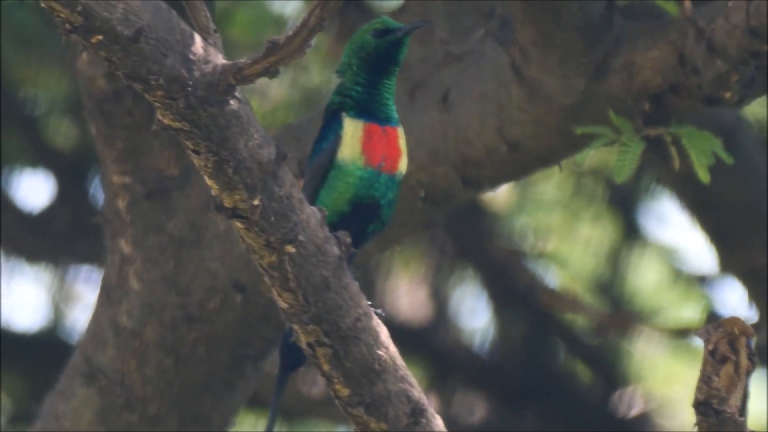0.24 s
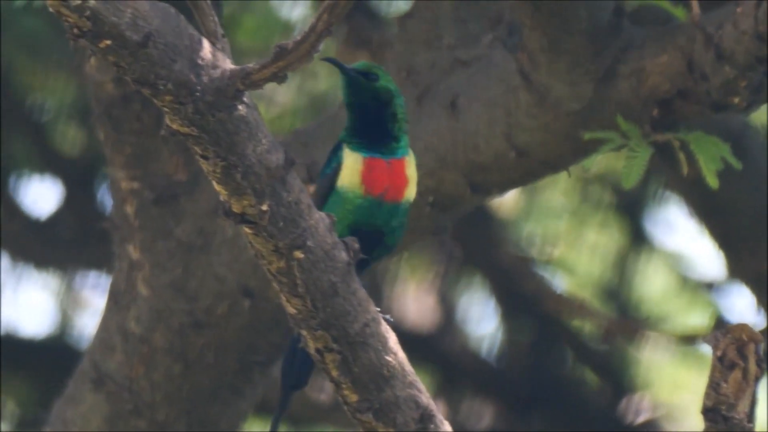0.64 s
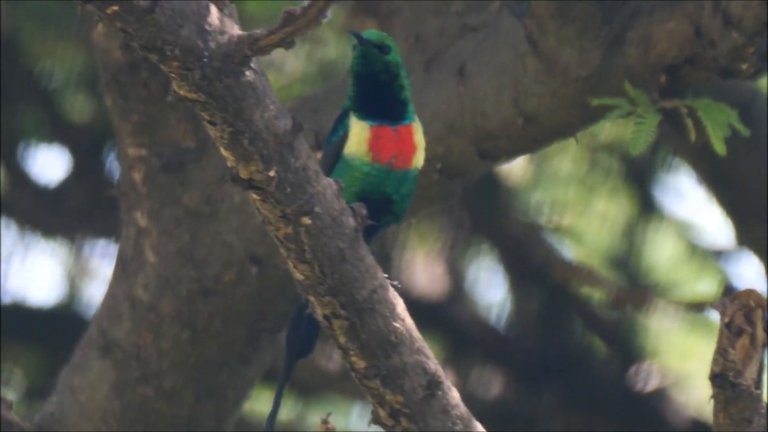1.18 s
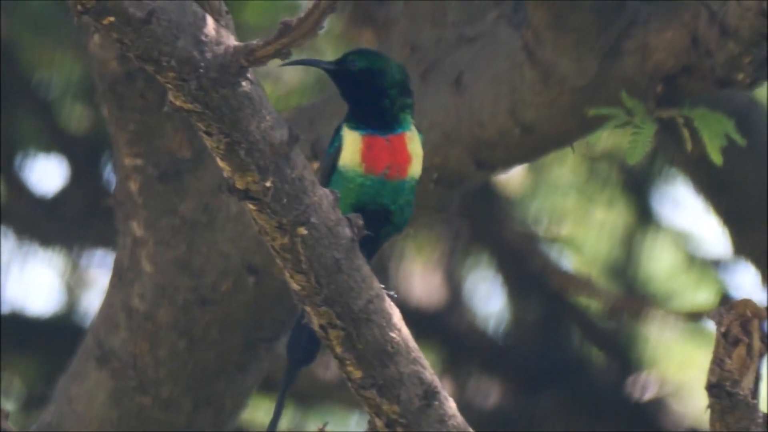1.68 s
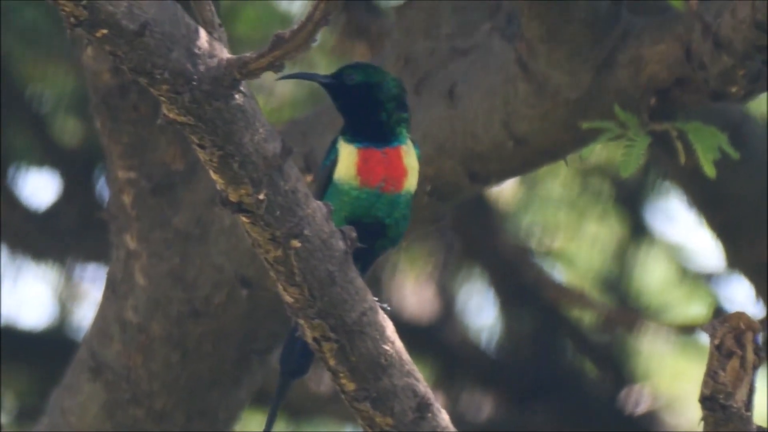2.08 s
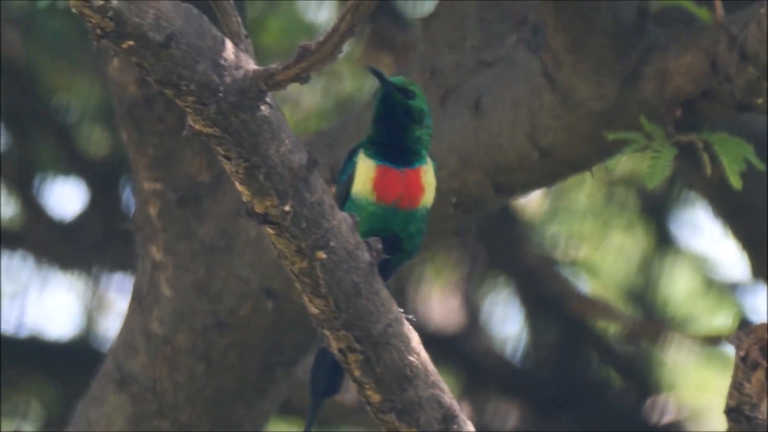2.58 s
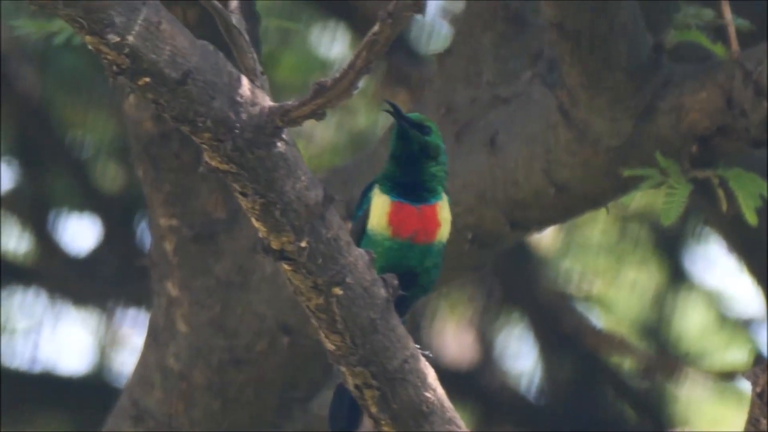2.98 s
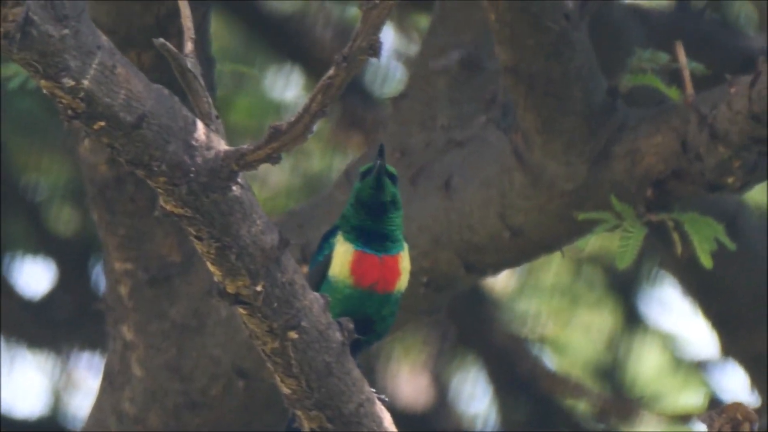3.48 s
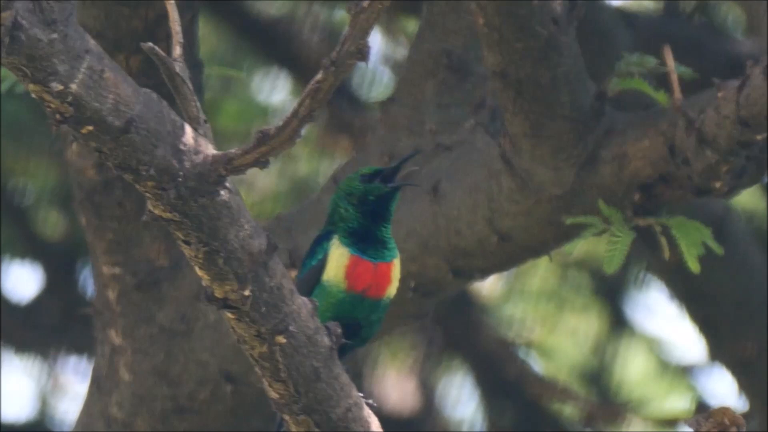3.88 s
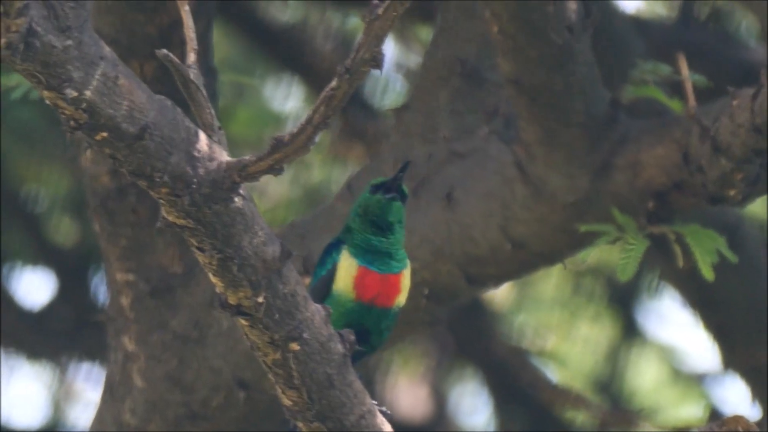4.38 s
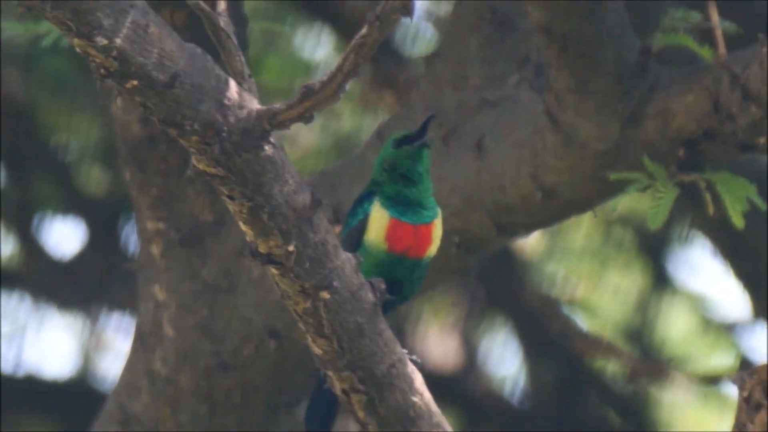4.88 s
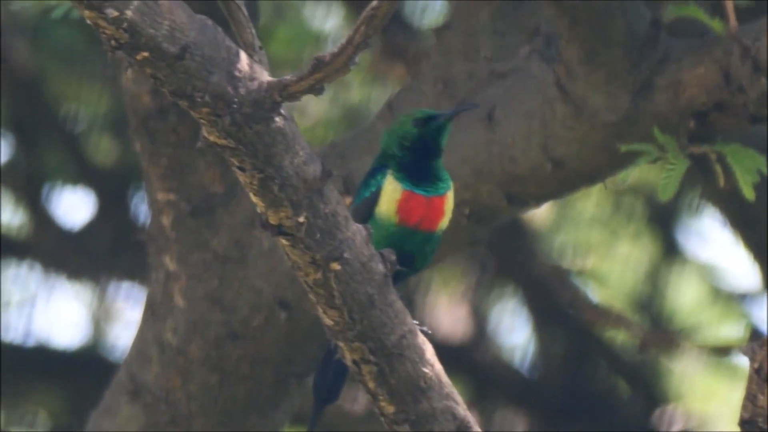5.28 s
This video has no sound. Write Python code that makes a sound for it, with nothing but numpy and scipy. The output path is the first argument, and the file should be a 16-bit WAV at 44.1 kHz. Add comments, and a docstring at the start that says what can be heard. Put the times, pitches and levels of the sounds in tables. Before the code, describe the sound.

Outdoors in a tree, dry chirps quicken into bright high twittering; faint engine throb, distant peeps, handling knocks, and a final sharp click.

```python
"""Over a soft outdoor rush, a distant engine, pulsed once per firing, throbs and fades; a far bird peeps and whistles.
A handled camera knocks, crackles and rubs: lone impulses, grainy noise and ringing modes.
Then a sunbird on a branch, built from gliding and shaken sine tones, gives eight harsh chips, a quicker
twitter and high, slurred whistles, answered by echoes from trunk and limbs and a noise tail from the crown.
A sharp control click ends it."""
import sys
import numpy as np
from scipy import signal
from scipy.fft import rfft, irfft, next_fast_len
from scipy.io import wavfile
from scipy.ndimage import map_coordinates

SR = 44100
rng = np.random.default_rng(int(sys.argv[2]) if len(sys.argv) > 2 else 0)


def wrap_up_sound(samples):
    """Save the sound to the file named by the first command line argument, as 16-bit audio."""
    columns = np.atleast_2d(samples).T
    # keep every value between -1 and 1, then stretch to whole-number steps
    tamed = np.clip(columns, -1, 1)
    steps = np.round(tamed * 32767).astype(np.int16)
    wavfile.write(sys.argv[1], SR, steps)


N = 244314  # length in samples, about 5.54 s


def amp(db):
    """Decibels to an amplitude factor."""
    return 10 ** (np.asarray(db) / 20)


def unit(x):
    """Scale to an rms of 1."""
    return x / np.sqrt(np.mean(x ** 2) + 1e-20)


def along(points, hz):
    """Read (f/Hz, value) points at hz, on a log frequency axis."""
    f, v = np.transpose(points)
    return np.interp(np.log(hz + 1), np.log(f + 1), v)


def curves(rows):
    """One automation curve, a value per sample, for each column after the time."""
    s, *cols = np.transpose(rows)
    return [np.interp(np.arange(N) / SR, s, c) for c in cols]


def wobble(rate):
    """A smooth random curve with rate knots a second."""
    knots = rng.standard_normal(N // 4)
    return map_coordinates(knots, [np.arange(N) * rate / SR], mode="wrap")


def filtered(x, response):
    """Filter x by a response of frequency, padded so that the end does not wrap round."""
    m = next_fast_len(N + SR // 2)
    return irfft(rfft(x, m) * response(np.fft.rfftfreq(m, 1 / SR)), m)[..., :N]


def coloured(x, spectrum):
    """EQ x with a (f/Hz, level/dB) curve."""
    return filtered(x, lambda hz: amp(along(spectrum, hz)))


def add(track, s, sound):
    """Mix a sound into the track at s seconds."""
    part = track[round(s * SR):][:len(sound)]
    part += sound[:len(part)]


def swell(u, crest, edge):
    """A note's envelope of rms 1: it rises to its crest and falls back to silence."""
    arch = np.sin(np.pi * np.interp(u, [0, np.clip(crest, .1, .9), 1], [0, .5, 1]))
    return unit(np.abs(arch) ** edge)


def arc(s, length, pitches, db, crest, rasp, doubling=0, edge=0.22):
    """A note whose pitch bends smoothly through the values: (s, pitch, envelope, rasp, doubling)."""
    u = np.linspace(0, 1, round(length * SR))
    bend = np.polyfit(np.linspace(0, 1, len(pitches)), pitches, len(pitches) - 1)
    return s, np.polyval(bend, u), amp(db) * swell(u, crest, edge), rasp, doubling


# spectrum of the open air: (f/Hz, relative level/dB per Hz)
AIR = [(25, 10.5), (70, -7.5), (120, -5.5), (220, -1), (350, -3), (500, -5.5), (850, -3), (1100, -4),
       (1450, -12), (1820, -7.5), (2100, -14.5), (3200, -13.5), (4500, -19.5), (8200, -24.5), (9100, -30.5)]
# likeness of left and right in the air: (f/Hz, correlation)
ALIKE = [(30, 0.78), (120, .99), (300, 0.98), (600, 0.91), (1200, 0.68), (3000, 0.44), (8000, 0.1)]
# swells of the breeze, before a small lift and flutter: (t/s, level/dB)
BREEZE = [(0, -54.5), (1.16, -54), (1.8, -53.5), (2.4, -54), (4.09, -53.5), (4.33, -49.5), (4.55, -53.5),
          (5.54, -54.5)]
# spectrum of the microphone hiss: (f/Hz, relative level/dB per Hz)
HISS = [(8900, -35), (9600, -11), (10700, -8.5), (11300, -5), (12000, -.5), (15700, 0)]
HISS_DB = -65.5


def air(lift_db=1, flutter_db=.3):
    """A soft outdoor rush, most alike left and right in the bass, over each microphone's own hiss."""
    def turn(hz):
        # the angle that splits the power between mid and side
        return np.arccos(np.clip(along(ALIKE, hz), -1, 1)) / 2

    def mid_side(hz):
        return amp(along(AIR, hz)) * [np.cos(turn(hz)), np.sin(turn(hz))]

    mid, side = filtered(rng.standard_normal((2, N)), mid_side)
    level_db = curves(BREEZE)[0] + lift_db + flutter_db * wobble(6.3)
    rush = unit(np.array([mid + side, mid - side])) * amp(level_db)
    hiss = unit(coloured(rng.standard_normal((2, N)), HISS))
    return rush + amp(HISS_DB) * hiss


# engine speed: (t/s, firings per s)
FIRING = [(0, 27.45), (.4, 28.3), (1, 29.55), (1.3, 30.1), (2, 30.9), (2.6, 31.4), (5.54, 32)]
# engine loudness, before a random scatter: (t/s, level/dB, gain of the deepest boom/dB)
ENGINE = [(0, -53, 2.5), (.4, -56, 3.5), (.7, -53, 3), (1, -55.5, 1.5), (1.3, -58, 2), (1.6, -56.5, -15),
          (2, -62, 7), (2.6, -62.5, -4), (3.1, -72, -2), (5.54, -85, 0)]
# spectrum of the exhaust: (f/Hz, level/dB)
EXHAUST = [(30, -26), (75, -16), (110, -1.5), (148, 4), (180, -5.5), (240, -7.5), (320, -13), (450, -68),
           (1500, -75)]
# the part of the exhaust that swells on its own: (f/Hz, level/dB)
BOOM = [(120, 0), (138, -40)]


def engine(scatter_db=1, first_turn=.5):
    """One puff per firing; only the exhaust's low notes carry this far, and the deepest swells and sinks."""
    turns = first_turn + np.cumsum(curves(FIRING)[0]) / SR
    firings = np.diff(np.floor(turns), prepend=0)
    level_db, boom_db = curves(ENGINE)
    puffs = unit(coloured(firings, EXHAUST))
    boom = (amp(boom_db) - 1) * coloured(puffs, BOOM)
    return -amp(level_db + scatter_db * wobble(20)) * (puffs + boom)


# decay of the leafy crown: (f/Hz, t60/s)
CROWN = [(200, 0.1), (3000, 0.044), (6000, 0.44), (8200, 0.29), (14000, 0.064)]


def crown(x, width=0.83, build_s=0.00078, patchy_db=4):
    """Leaves and twigs scatter the sound into a short, patchy tail of decaying noise."""
    grains = rng.standard_normal((2, SR // 2)) * amp(patchy_db * wobble(294)[:SR // 2])
    hz, t, z = signal.stft(grains, SR, nperseg=256)
    fade = amp(-60 * t / along(CROWN, hz)[:, None]) * (1 - np.exp(-t / build_s))
    mid, side = signal.istft(z * fade, SR, nperseg=256)[1]
    tail = np.array([mid + width * side, mid - width * side])
    return signal.fftconvolve(x[None], tail / np.linalg.norm(tail[0]), axes=1)[:, :N]


def arriving(x, delay_s, db, skew_s):
    """A sound after a path of delay_s, reaching the two microphones a little apart."""
    delays_s = delay_s + np.array([[skew_s], [-skew_s]])
    return amp(db) * filtered(x, lambda hz: np.exp(-2j * np.pi * hz * delays_s))


# the far bird's falling peeps: (t/s, start f/Hz, level/dB)
PEEPS = [(.941, 6160, -69), (1.0, 6100, -69), (1.032, 6150, -68), (1.091, 6150, -68), (1.126, 5850, -70),
         (1.158, 5580, -72), (1.19, 6000, -65), (1.226, 6050, -73), (1.254, 5830, -76),
         (1.471, 4650, -65.5), (1.51, 6600, -70), (1.55, 4680, -69), (1.789, 4750, -66),
         (1.817, 4720, -63.5), (3.41, 6200, -74), (3.443, 6100, -68)]
# thin arches from farther still: (t/s, length/s, level/dB)
FAR_WHISTLES = [(1.91, .05, -79), (1.98, .07, -74), (2.057, .085, -75), (2.16, .07, -78)]
# their upper voice at start, middle and end: f/Hz
FAR_ARCH_HZ = (4080, 4450, 4100)


def far_bird(length=0.012, fall=0.115, lower_db=-2, lower_ratio=.865):
    """Short sine peeps that slide down, and a few thin whistles of two sines at a fixed pitch ratio."""
    song, u = np.zeros(N), np.linspace(0, 1, round(length * SR))
    for s, span, db in FAR_WHISTLES:
        _, pitch, envelope, *_ = arc(s, span, FAR_ARCH_HZ, db, crest=.55, rasp=0)
        phase = 2 * np.pi * np.cumsum(pitch) / SR
        voices = np.sin(phase) + amp(lower_db) * np.sin(lower_ratio * phase)
        add(song, s, envelope * unit(voices))
    for s, hz, db in PEEPS:
        tone = unit(np.sin(2 * np.pi * np.cumsum(hz * (1 - fall * u)) / SR))
        add(song, s, amp(db) * swell(u, 0.62, edge=0.45) * tone)
    return song


def struck(modes, bright_db):
    """One blow of peak 1: neighbouring modes swing opposite ways, a harder contact favours the high ones."""
    t = np.arange(SR // 10) / SR
    ring = np.zeros(len(t))
    for k, (hz, db, t60) in enumerate(modes):
        tilt_db = bright_db * np.log10(hz / modes[0][0])  # dB per decade above the lowest mode
        ring += (-1) ** k * amp(db + tilt_db - 60 * t / t60) * np.sin(2 * np.pi * hz * t)
    return ring / np.abs(ring).max()


# Handling levels below are set before the scene's camera gain; crackles also before boost and grip EQ.
# sharp crackles of the grip: (t/s, level/dB)
CRACKLES = [(1.1578, -38.5), (1.1813, -31.5), (1.327, -47), (1.4571, -52), (1.658, -50), (1.846, -56),
            (1.9855, -44)]
# EQ of the grip: (f/Hz, level/dB)
GRIP = [(100, -22), (600, -9), (1300, -1), (2000, 0), (2750, 1), (3300, -17), (4500, -22), (6000, -18),
        (7500, -28), (10000, -45)]
# fingers rub on the grip, before the skin's ticks: (t/s, length/s, level/dB)
RUBS = [(1.169, 0.07, -59), (1.452, 0.11, -66.5), (1.575, 0.1, -59), (1.833, 0.022, -57.5),
        (1.976, 0.035, -66)]
# EQ of rubbing skin: (f/Hz, level/dB)
SKIN = [(100, -16), (500, -1), (2200, 0), (3200, -9), (6000, -19), (10000, -45)]
# knocks on the camera body: (t/s, peak level/dB, brightness/dB per decade)
KNOCKS = [(.675, -44.5, -34), (0.684, -45.5, -18), (2.953, -45.5, -23), (3.178, -41.5, -13),
          (4.163, -19, 4.5), (4.181, -39, 14)]
# modes of the camera body: (f/Hz, level/dB, t60/s)
BODY = [(200, 3, 0.049), (377, 2.5, 0.034), (825, -4, 0.027), (1030, 2, 0.023), (1540, -2, 0.0041),
        (2200, -6, 0.0047)]
# fingertips tap the hollow grip: (t/s, peak level/dB)
TAPS = [(1.463, -44.5), (1.59, -50), (1.632, -48), (1.848, -48), (1.99, -42.5)]
# modes of the hollow grip: (f/Hz, level/dB, t60/s)
HOLLOW = [(306, -1.5, 0.13), (630, -1.5, 0.15), (1030, -2, 0.025), (1860, 1, 0.019)]
# a control clicks and seats: (t/s, peak level/dB)
CLICKS = [(5.5259, -15.5), (5.5305, -25.5)]
# modes of the control: (f/Hz, level/dB, t60/s)
BUTTON = [(1940, -23, 0.032), (2934, 2.5, 0.031), (3540, 13, 0.0031), (5040, 1, 0.006), (7380, 6, 0.0048),
          (8100, -31, 0.0028), (11200, -26, .002)]


def handling(snap_db=17, grain_db=4, ticks_per_s=90, tick_db=18):
    """Impulses crackle in the grip, grainy noise rubs, and struck modes knock, tap and click."""
    snaps, pressure, shell = np.zeros((3, N))
    for s, db in CRACKLES:
        add(snaps, s, amp([db + snap_db]))
    for s, length, db in RUBS:
        add(pressure, s, amp(db) * swell(np.linspace(0, 1, round(length * SR)), 0.18, edge=0.28))
    # skin sticks and slips, so the rubbing comes in small grains with stray ticks among them
    grains = rng.standard_normal(N) * amp(grain_db * wobble(500))
    rubbing = pressure * unit(coloured(grains, SKIN))
    ticks = amp(tick_db) * pressure * (rng.random(N) < ticks_per_s / SR)
    for s, db, bright_db in KNOCKS:
        add(shell, s, amp(db) * struck(BODY, bright_db))
    for s, db in TAPS:
        add(shell, s, amp(db) * struck(HOLLOW, 0))
    for s, db in CLICKS:
        add(shell, s, amp(db) * struck(BUTTON, 0))
    return coloured(snaps + ticks, GRIP) + rubbing + shell


# Song levels below are set before the throat's EQ, and pitches before the voice's random shake.
# harsh opening chips: (t/s, length/s, level/dB, reference f/Hz)
CHIPS = [(2.602, 0.026, -53, 3700), (2.729, 0.028, -52.5, 3760), (2.924, 0.0295, -52, 3670),
         (3.086, 0.022, -53, 3790), (3.294, .024, -55.5, 3800), (3.52, 0.0238, -52.5, 3990),
         (3.705, 0.027, -54.5, 3910), (3.869, 0.023, -54.5, 3900)]
# strands of a chip, from low to high: (delay/s, offset from the reference f/Hz, relative level/dB)
CHIP_STRANDS = [(.017, -560, -9.5), (.004, -7, -1.5), (0, 805, -2), (0, 1580, -5.5), (0, 2447, -16),
                (0, 4002, -20.5)]
CHIP_FALL_HZ, CHIP_RASP = 600, 0.496
# from the fourth on, each chip runs into a falling slur: (t/s, length/s, start f/Hz, middle f/Hz, level/dB)
SLURS = [(3.106, 0.052, 5200, 4400, -54.5), (3.305, 0.054, 5200, 4590, -51.5),
         (3.539, 0.051, 5250, 4330, -51.5), (3.722, .056, 5150, 4490, -51),
         (3.884, 0.061, 5030, 4870, -48.5)]
SLUR_END_HZ, SLUR_RASP = 3466, 0.49
# ragged strands above and below each slur: (start f/Hz, end f/Hz, level over the slur/dB)
STRANDS = [(6370, 5800, -14.5), (4250, 3350, -10.5)]
STRAND_LEAD_S, STRAND_S, STRAND_RASP = .006, 0.055, 0.464


def chips():
    """Short, harsh stacks of falling strands; the later ones trail off in a slur."""
    for s, length, db, reference_hz in CHIPS:
        for delay, offset_hz, strand_db in CHIP_STRANDS:
            hz = reference_hz + offset_hz
            fall = (hz + CHIP_FALL_HZ / 2, hz - CHIP_FALL_HZ / 2)
            yield arc(s + delay, length, fall, db + strand_db, crest=0.56, rasp=CHIP_RASP, edge=0.45)
    for s, length, top_hz, middle_hz, db in SLURS:
        yield arc(s, length, (top_hz, middle_hz, SLUR_END_HZ), db, crest=0.37, rasp=SLUR_RASP)
        for start_hz, end_hz, strand_db in STRANDS:
            yield arc(s - STRAND_LEAD_S, STRAND_S, (start_hz, end_hz), db + strand_db,
                      crest=0.24, rasp=STRAND_RASP)


# reedy tones that break into a downward flick:
# (t/s, length/s, start f/Hz, middle f/Hz, end f/Hz, level/dB, flick f/Hz, flick level/dB)
TWITTER = [(4.02, 0.028, 6920, 6270, 5980, -45.5, 5390, -45.5),
           (4.068, 0.039, 5350, 5500, 5380, -47.5, 5510, -43),
           (4.129, 0.022, 6100, 6700, 7280, -47, 5300, -43),
           (4.187, 0.034, 5080, 5390, 5600, -45.5, 5500, -43),
           (4.252, 0.025, 6380, 6430, 7170, -45, 5350, -44),
           (4.327, 0.025, 5300, 5390, 5500, -46.5, 5670, -42),
           (4.392, .025, 6390, 6680, 7860, -46, 6500, -46.5),
           (4.464, 0.024, 5280, 5330, 5500, -44.5, 5470, -44),
           (4.532, 0.013, 5440, 6300, 6940, -48, 7050, -43)]
TWITTER_RASP, TWITTER_DOUBLING = 0.28, 1
FLICK_S, FLICK_FALL, FLICK_RASP = 0.0129, 0.111, 0.4  # length, share of its pitch that it loses, rasp
FLICK_LEAD_S = .0025  # the flick starts before its tone has ended
# a second vibration throws side strands round each flick: (pitch ratio to the flick, relative level/dB)
FLICK_SIDES = [(1.22, -12.5), (1.5, -15)]
# the other side of the syrinx, under each flick: start, middle and end pitch, and level
UNDERTONE_HZ, UNDERTONE_DB = (3800, 3840, 3460), -56.5
# notes that plunge: (t/s, length/s, start f/Hz, middle f/Hz, end f/Hz, level/dB)
PLUNGES = [(4.147, 0.025, 7260, 6950, 5500, -53), (4.154, 0.017, 5180, 4950, 4150, -41),
           (4.273, 0.011, 5200, 4950, 3950, -49), (4.415, 0.016, 7300, 6400, 3860, -44.5),
           (4.544, 0.021, 7010, 5960, 3460, -51.5)]


def twitter():
    """Quick syllables, high and low by turns; each tone snaps into a rasping flick over a weak undertone."""
    for s, length, start_hz, middle_hz, end_hz, db, flick_hz, flick_db in TWITTER:
        yield arc(s, length, (start_hz, middle_hz, end_hz), db,
                  crest=0.61, rasp=TWITTER_RASP, doubling=TWITTER_DOUBLING, edge=0.17)
        flick_s = s + length - FLICK_LEAD_S
        fall = np.array([flick_hz, flick_hz * (1 - FLICK_FALL)])
        yield arc(flick_s, FLICK_S, fall, flick_db, crest=0.2, rasp=FLICK_RASP)
        for ratio, side_db in FLICK_SIDES:
            yield arc(flick_s, FLICK_S, ratio * fall, flick_db + side_db, crest=0.27, rasp=FLICK_RASP)
        yield arc(flick_s, FLICK_S, UNDERTONE_HZ, UNDERTONE_DB, crest=0.38, rasp=0.12)
    for s, length, *pitches, db in PLUNGES:
        yield arc(s, length, pitches, db, crest=0.53, rasp=0.49, doubling=1.0)


# free whistles, and a fading, buzzing echo near 7 kHz, one curve each: (t/s, f/Hz, level/dB, rasp 0-1)
WHISTLES = [
    [(4.575, 4230, -54, .25), (4.593, 4610, -45, 0.45), (4.604, 4340, -53, 0.2)],
    [(4.556, 7020, -50, .6), (4.582, 6940, -52, .8), (4.61, 6900, -60, .6)],
    [(4.646, 5070, -59, 0.84), (4.656, 5640, -44, 0.5), (4.671, 5440, -44.5, 0.33),
     (4.679, 7450, -33, 0.26), (4.687, 7450, -36, 0.03), (4.7, 6630, -43, 0.56)],
    [(4.781, 4400, -49, 0.4), (4.788, 4320, -50.5, 0.47), (4.797, 3450, -54, 0.8)],
    [(4.784, 8800, -49, 0.16), (4.795, 6090, -46, 0.73), (4.815, 7200, -46, 0.3), (4.82, 7330, -38, 0.5),
     (4.827, 7170, -35.5, 0.42), (4.836, 7720, -35, 0.2), (4.845, 7990, -30, 0.1), (4.861, 8180, -34, 0.1),
     (4.868, 7800, -42, .3)],
]


def whistles():
    """Slurred whistles and one buzzing echo, whose pitch, level and rasp each follow a drawn curve."""
    for points in WHISTLES:
        s, *controls = np.transpose(points)
        t = np.arange(s[0], s[-1], 1 / SR)
        hz, db, rasp = (np.interp(t, s, c) for c in controls)
        yield s[0], hz, amp(db) * signal.windows.tukey(len(t), .08), rasp, 0


# the closing motif, an arch and then a two-part hook: (arch t/s, arch level/dB, hook t/s, dip length/s,
# hook f/Hz, hook level/dB, then four pitches of the rise f/Hz)
MOTIFS = [(4.916, -42.5, 4.985, 0.026, 7550, -39, 6960, 7720, 7540, 7700),
          (5.099, -43, 5.173, .02, 8000, -34.5, 7430, 8020, 8370, 9200)]
ARCH_S, ARCH_HZ, ARCH_RASP = .045, (4400, 6340, 6520), 0.43
SECOND_VOICE_HZ, SECOND_VOICE_DB = (5260, 5550, 5180), -4.5  # under the arch's second half
# pitch of the dip at start, middle and end: ratio to the hook's
DIP_SHAPE = (.94, 1, 0.83)
HOOK_GAP_S, HOOK_RASP = 0.00121, 0.19
RISE_S, RISE_DB = 0.0294, 1.5  # length and gain of the hook's second part


def motifs():
    """A two-voiced arch, then a loud high hook that dips, breaks and rises again."""
    for s, db, hook_s, dip_s, hook_hz, hook_db, *rise_hz in MOTIFS:
        yield arc(s, ARCH_S, ARCH_HZ, db, crest=0.48, rasp=ARCH_RASP, doubling=0.54, edge=0.89)
        yield arc(s + ARCH_S / 2, ARCH_S / 2, SECOND_VOICE_HZ, db + SECOND_VOICE_DB,
                  crest=0.68, rasp=0.42, doubling=1.0)
        yield arc(hook_s, dip_s, hook_hz * np.array(DIP_SHAPE), hook_db, crest=0.27, rasp=HOOK_RASP)
        rise_s = hook_s + dip_s + HOOK_GAP_S
        yield arc(rise_s, RISE_S, rise_hz, hook_db + RISE_DB, crest=0.36, rasp=HOOK_RASP, edge=0.72)


TRILL_HZ, TRILL_DEPTH_HZ = 189.4, 98.5  # a quick, uneven quiver of pitch
# the quiver sets in at the first pitch and is full at the second: f/Hz
TRILL_RANGE_HZ = (5500, 7800)
STUTTER_DB, STUTTER_PER_S = 4.5, 150  # a rasping note falters, which breaks its stroke into beads
# EQ of throat and bill: (f/Hz, level/dB)
THROAT = [(2000, -24), (2900, -7), (3500, 1.5), (4200, 0), (8400, 0), (9100, -10), (10200, -22),
          (16000, -36)]
# spectrum of the high noise: (f/Hz, relative level/dB)
HIGH_NOISE = [(9000, -30), (10500, -4), (12000, 0), (15500, -1), (17000, -30)]
HIGH_NOISE_DB = -26


def sunbird(scatter_hz=720, shiver_db=0.5, waver_hz=22, half_db=-13, buzz_db=-4, overtone_db=-24, uneven=0.2993):
    """Each note is a gliding tone; in rasping notes the syrinx shakes irregularly in pitch and strength."""
    song, rasp_level = np.zeros((2, N))
    shake, shiver, waver, buzz = wobble(1100), wobble(600), wobble(250), wobble(5000)
    stutter = wobble(STUTTER_PER_S)
    trill_rate = TRILL_HZ * (1 + uneven * wobble(120))
    trill = TRILL_DEPTH_HZ * np.sin(2 * np.pi * np.cumsum(trill_rate) / SR)
    for s, pitch, envelope, rasp, doubling in [*chips(), *twitter(), *whistles(), *motifs()]:
        now = rng.integers(N // 2) + np.arange(len(pitch))  # each voice shakes in its own way
        quiver = trill[now] * np.interp(pitch, TRILL_RANGE_HZ, [0, 1])
        shaken_hz = pitch + quiver + rasp ** 2 * scatter_hz * shake[now] + waver_hz * waver[now]
        phase = 2 * np.pi * np.cumsum(shaken_hz) / SR
        tone = np.sin(phase) * (1 + rasp * amp(buzz_db) * buzz[now])
        tone += amp(overtone_db) * np.sin(2 * phase)
        # when the syrinx doubles its period, lines appear halfway between the harmonics
        tone += doubling ** 2 * amp(half_db) * (np.sin(phase / 2) + np.sin(phase + phase / 2))
        falter_db = rasp * (shiver_db * shiver[now] + STUTTER_DB * stutter[now])
        add(song, s, envelope * unit(tone * amp(falter_db)))
        add(rasp_level, s, envelope * np.sqrt(np.abs(rasp)))
    # a thin band of high noise follows the rasping notes
    high_noise = rasp_level * unit(coloured(rng.standard_normal(N), HIGH_NOISE))
    return coloured(song, THROAT) + amp(HIGH_NOISE_DB) * high_noise


# trunk and thick limbs that echo the song: (delay/s, level/dB, left-right skew/s)
LIMBS = [(.00117, -13, -.00006), (.00411, -7.5, -.00002), (.00459, -9, .00005), (.0165, -15, -.00003)]
# the bill beams its highest notes, so less reaches the leaves: (f/Hz, level/dB)
SPREAD = [(3500, 0), (6000, 0), (7300, -2.5), (8300, -4)]


def scene():
    """The bird, its reflections from the thick limbs and the crown, and everything around it."""
    song, far, hands = sunbird(), far_bird(), handling()
    limbs = sum(arriving(song, *limb) for limb in LIMBS)
    direct = song * amp([[.5], [-.5]])  # 1 dB louder on the left
    bird = direct + limbs + amp(-7.5) * crown(coloured(song, SPREAD))
    camera = arriving(hands, delay_s=0, db=2.0, skew_s=.00002) + amp(-10.5) * crown(hands)
    return bird + far + amp(-3.0) * crown(far) + camera + engine() + air()


BASS_CUT_HZ, TOP_HZ = 92, 15800


def record(dry):
    """The camera cuts the deep bass and keeps nothing above its band limit."""
    bass_cut = signal.butter(N=4, Wn=BASS_CUT_HZ, btype="high", fs=SR, output="sos")
    return filtered(signal.sosfilt(bass_cut, dry), lambda hz: hz < TOP_HZ)


dry = scene()
out = record(dry)
wrap_up_sound(out)
```